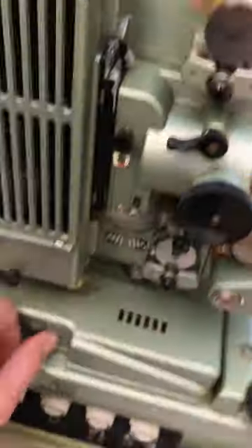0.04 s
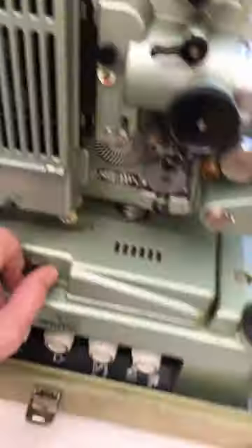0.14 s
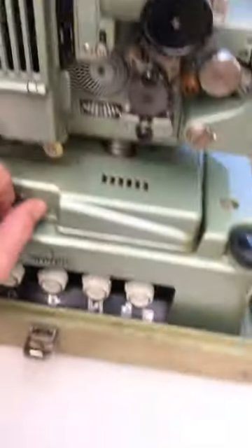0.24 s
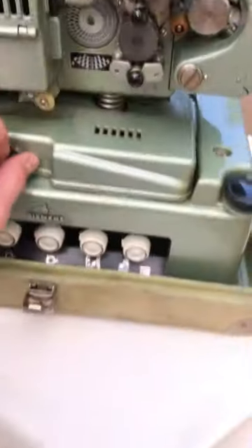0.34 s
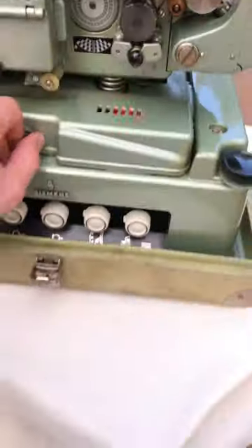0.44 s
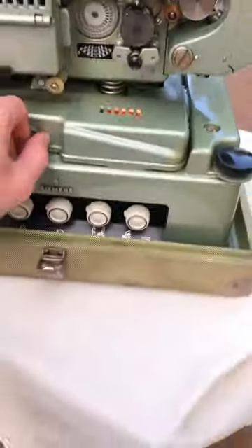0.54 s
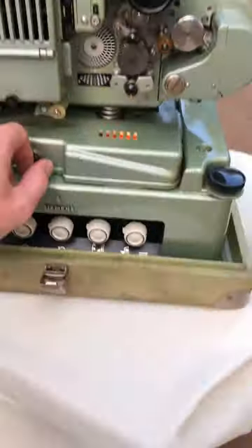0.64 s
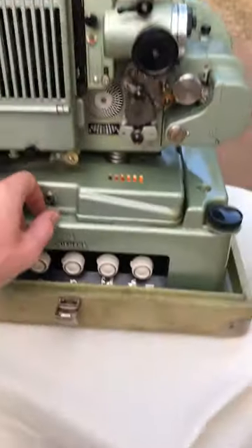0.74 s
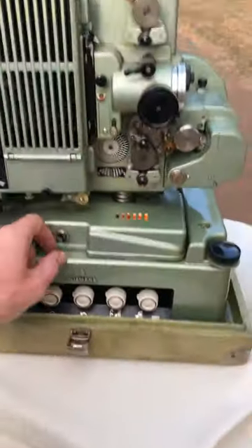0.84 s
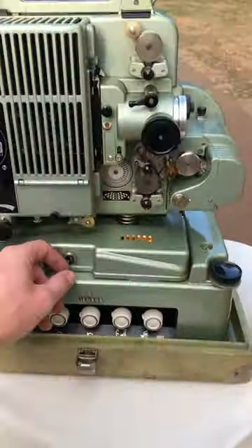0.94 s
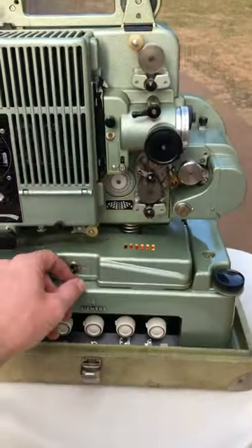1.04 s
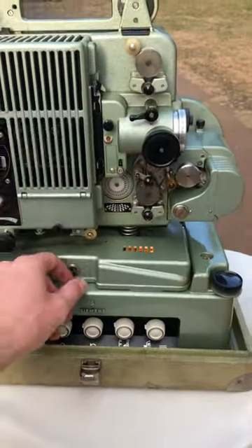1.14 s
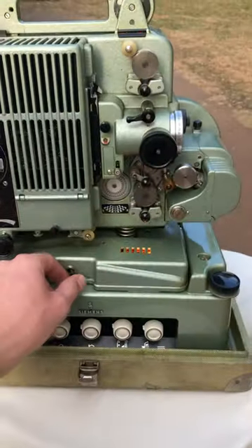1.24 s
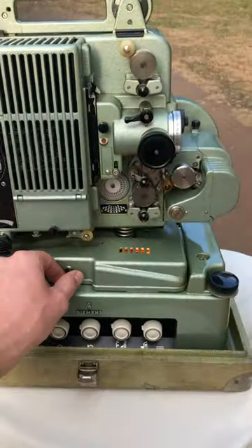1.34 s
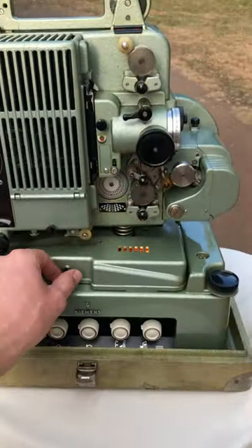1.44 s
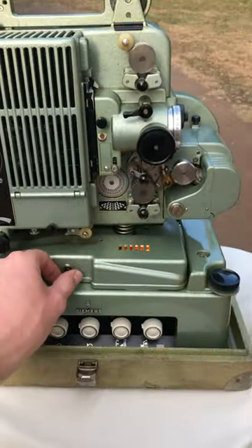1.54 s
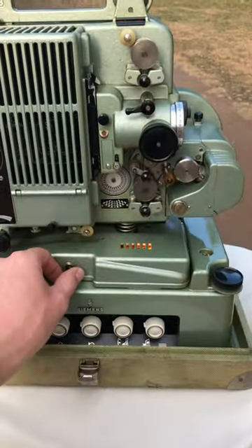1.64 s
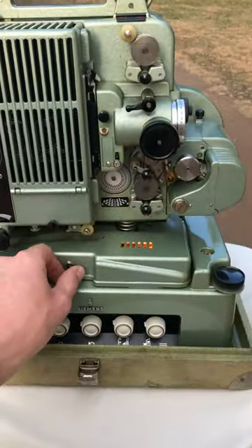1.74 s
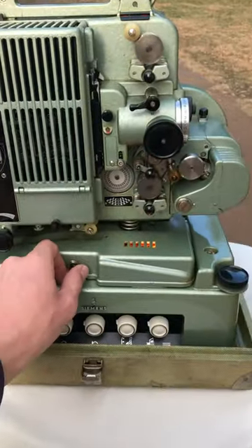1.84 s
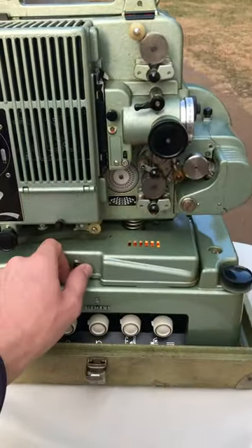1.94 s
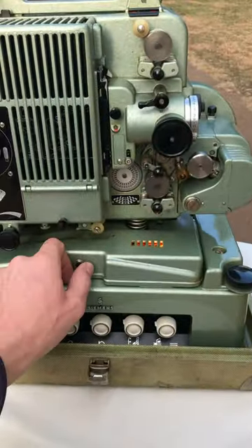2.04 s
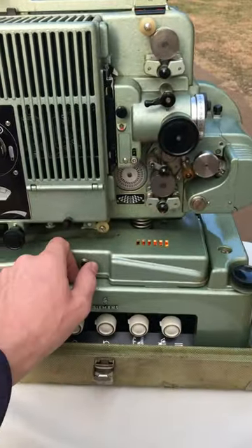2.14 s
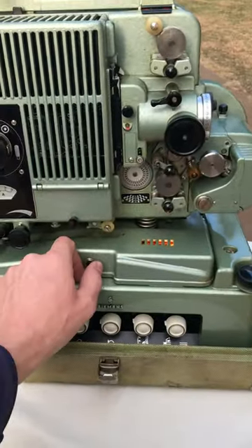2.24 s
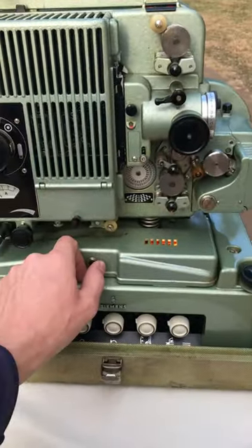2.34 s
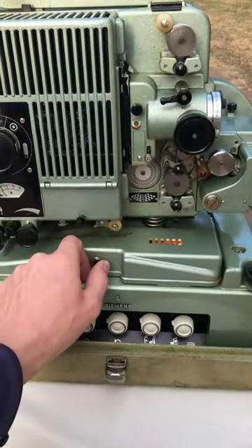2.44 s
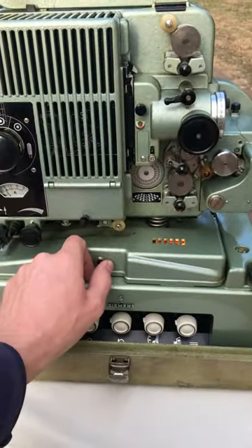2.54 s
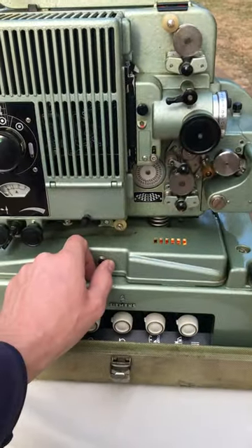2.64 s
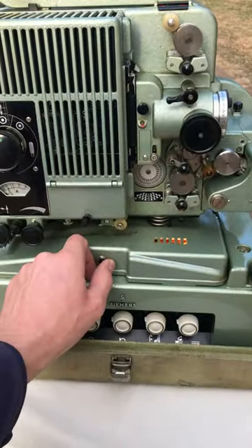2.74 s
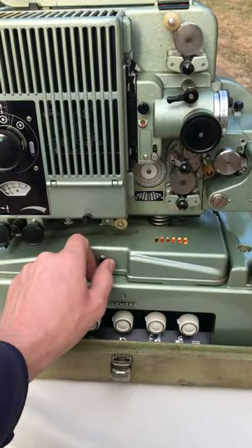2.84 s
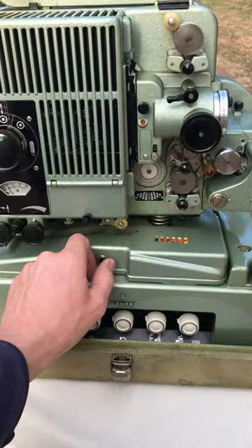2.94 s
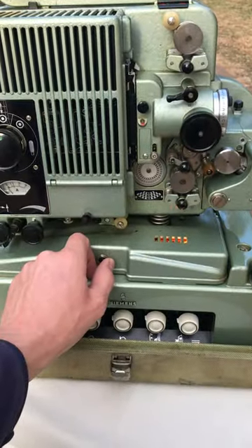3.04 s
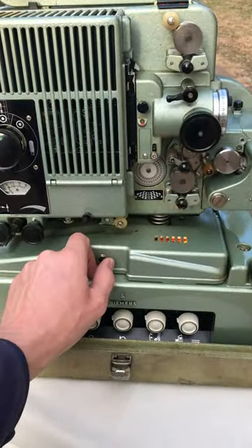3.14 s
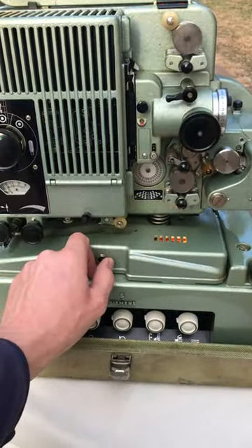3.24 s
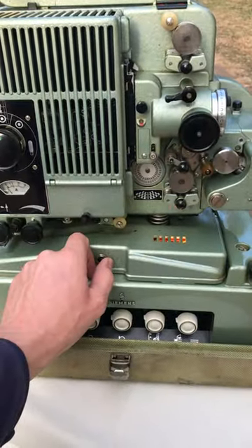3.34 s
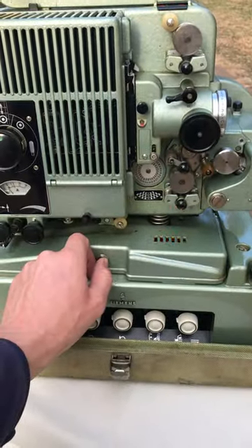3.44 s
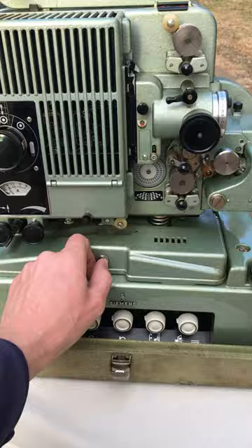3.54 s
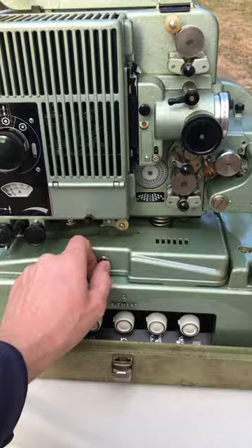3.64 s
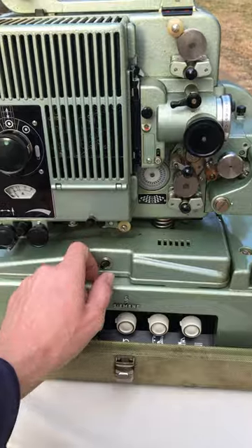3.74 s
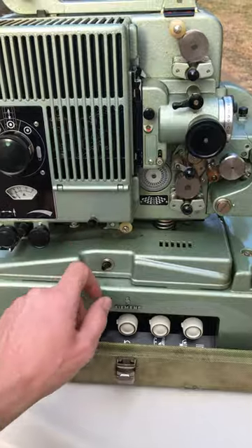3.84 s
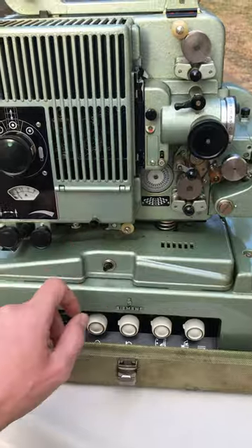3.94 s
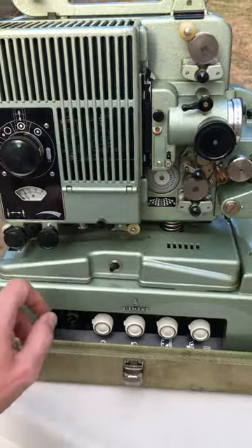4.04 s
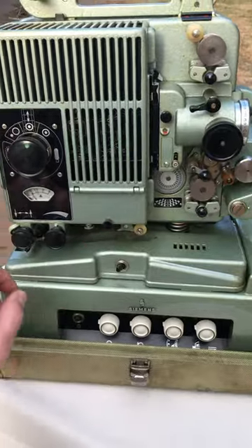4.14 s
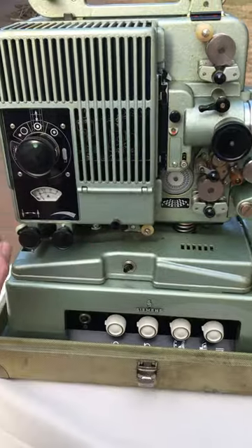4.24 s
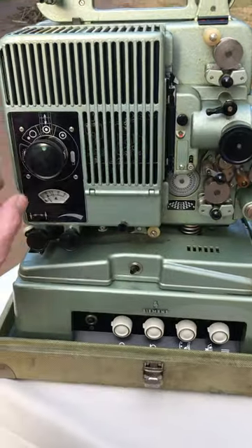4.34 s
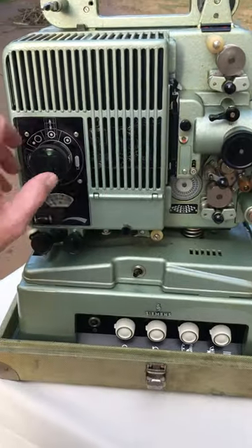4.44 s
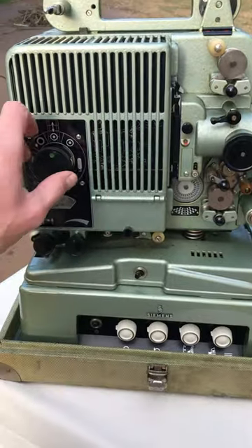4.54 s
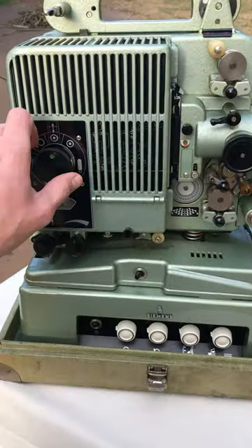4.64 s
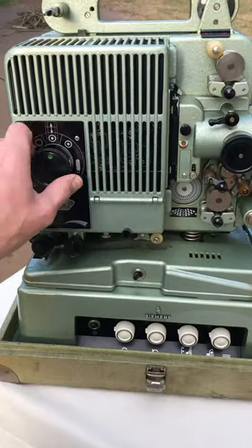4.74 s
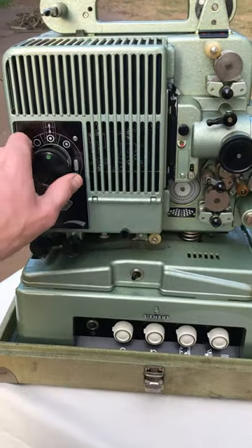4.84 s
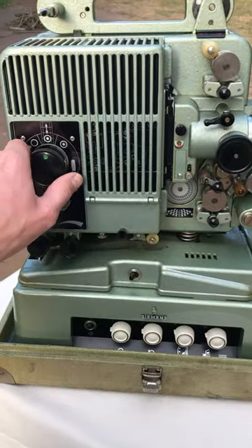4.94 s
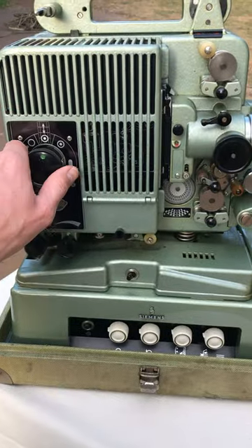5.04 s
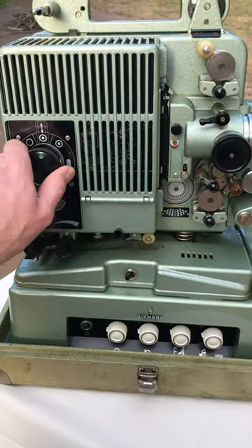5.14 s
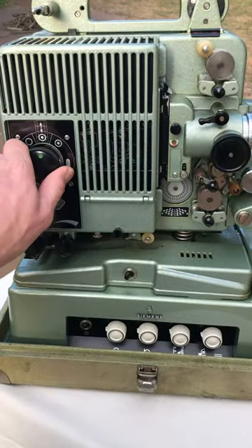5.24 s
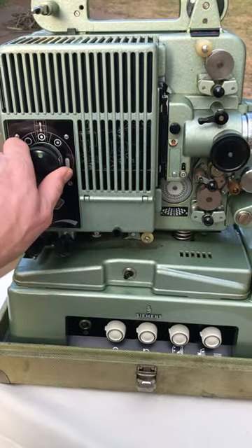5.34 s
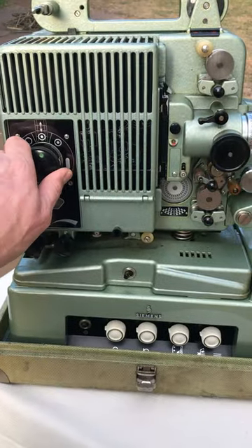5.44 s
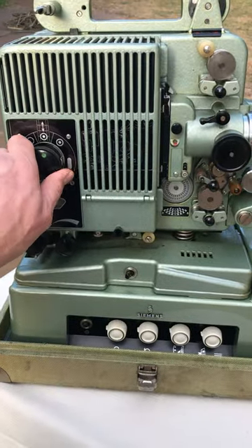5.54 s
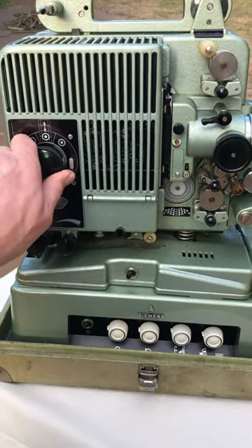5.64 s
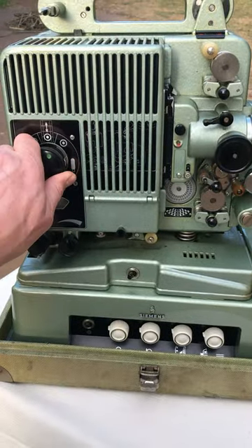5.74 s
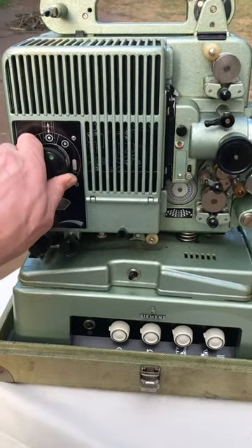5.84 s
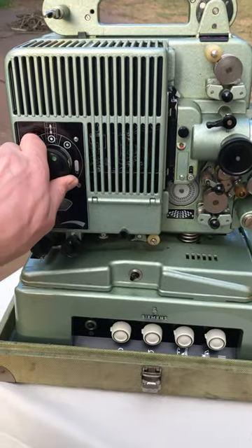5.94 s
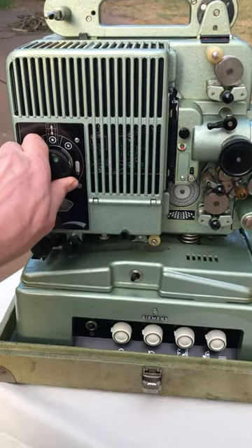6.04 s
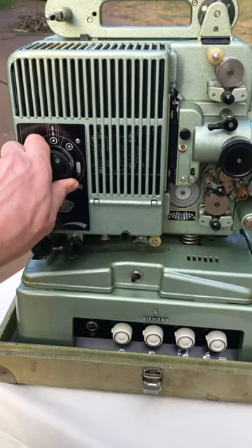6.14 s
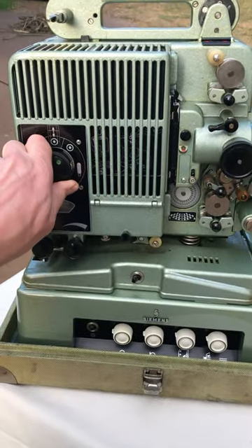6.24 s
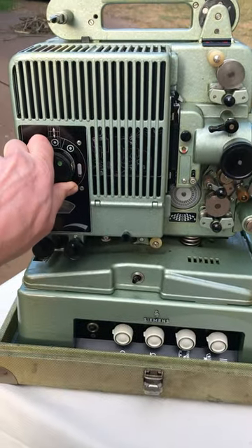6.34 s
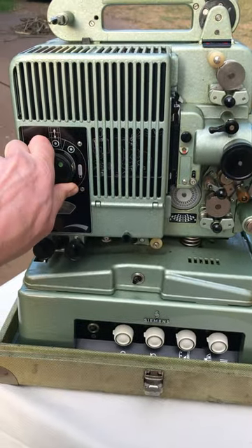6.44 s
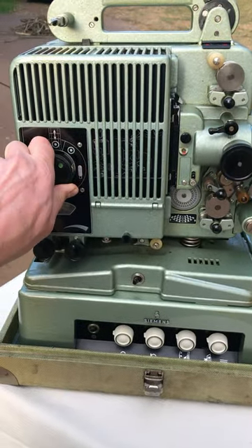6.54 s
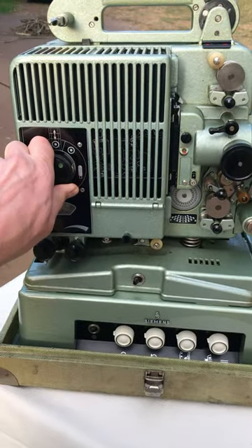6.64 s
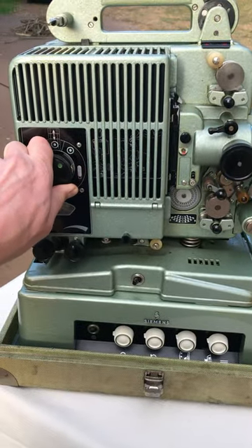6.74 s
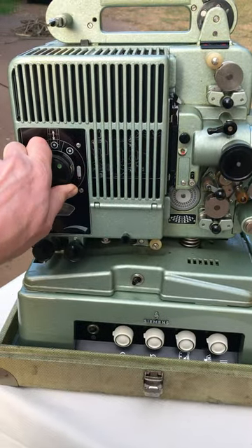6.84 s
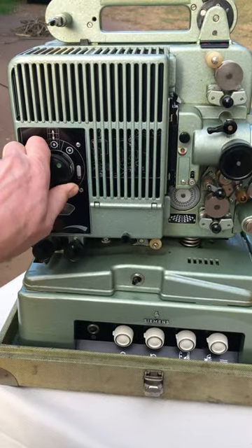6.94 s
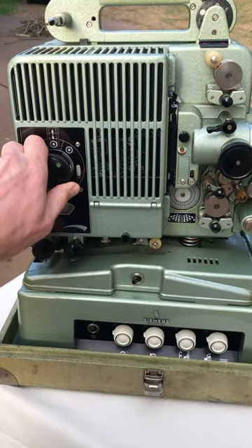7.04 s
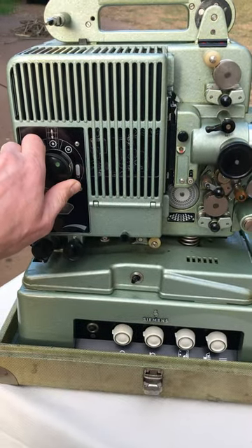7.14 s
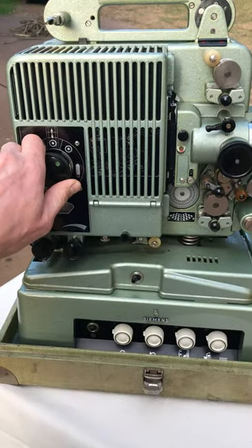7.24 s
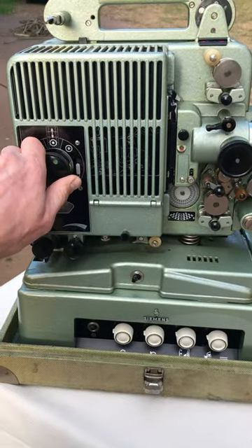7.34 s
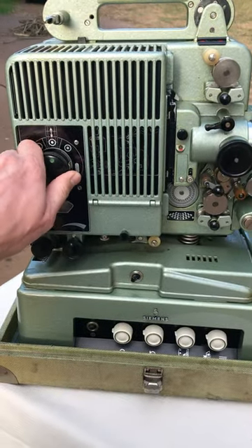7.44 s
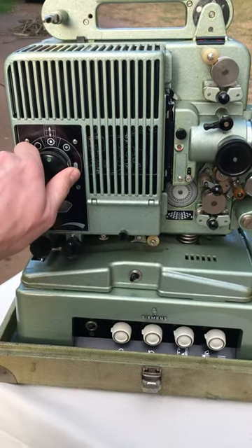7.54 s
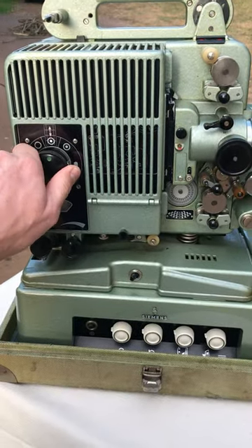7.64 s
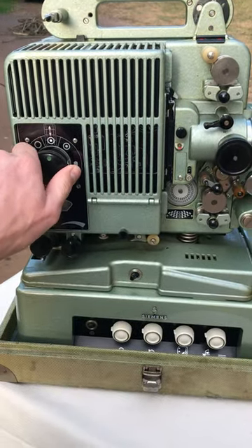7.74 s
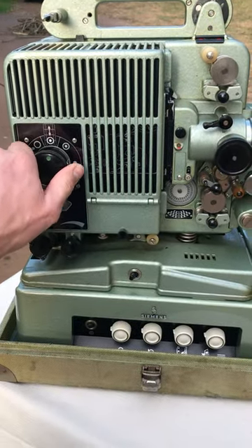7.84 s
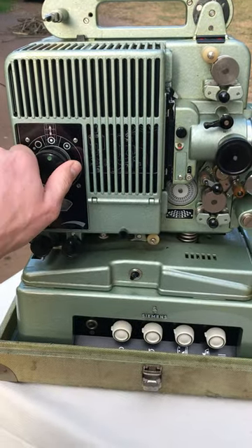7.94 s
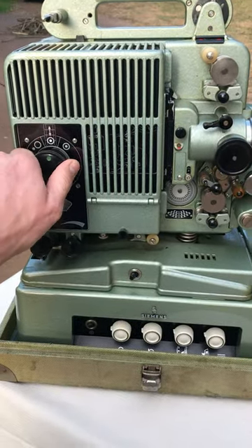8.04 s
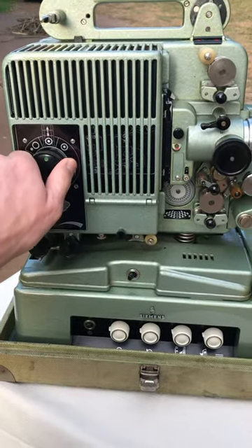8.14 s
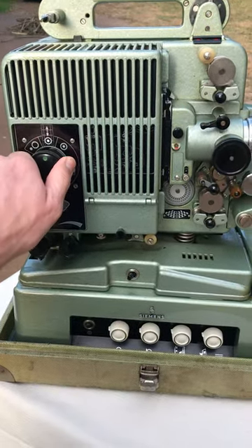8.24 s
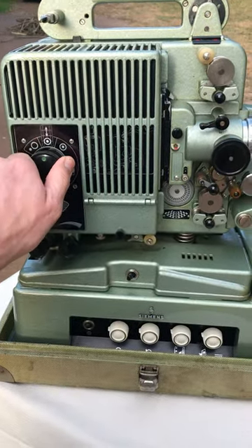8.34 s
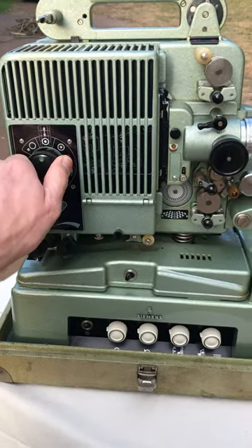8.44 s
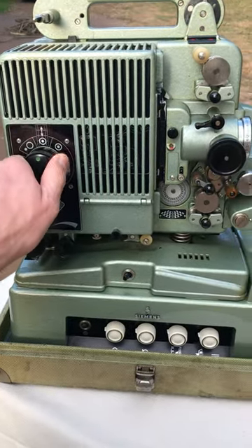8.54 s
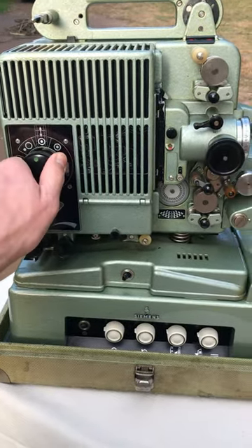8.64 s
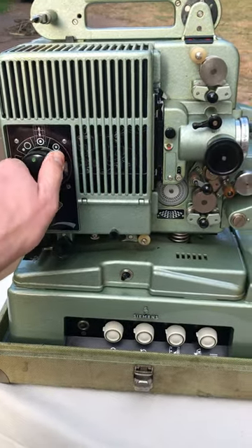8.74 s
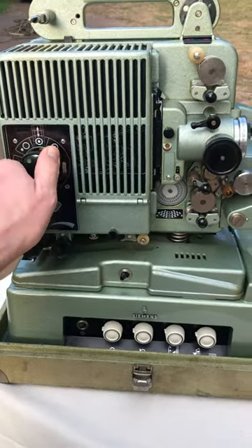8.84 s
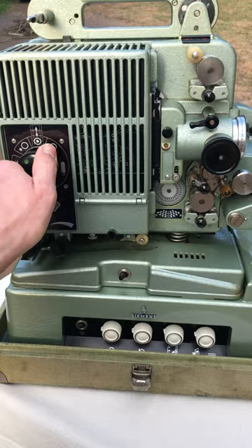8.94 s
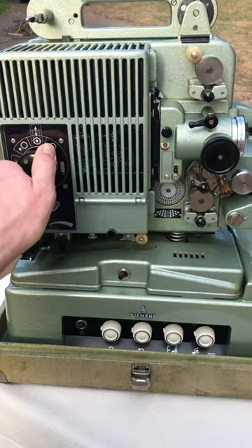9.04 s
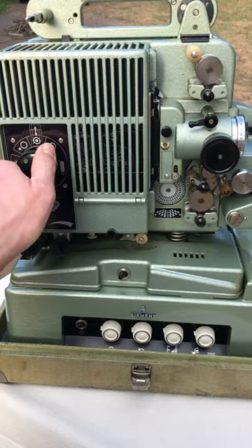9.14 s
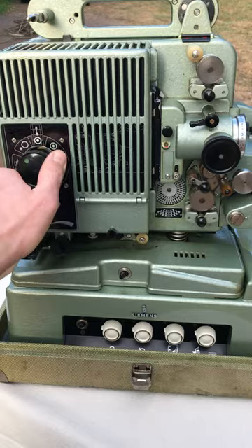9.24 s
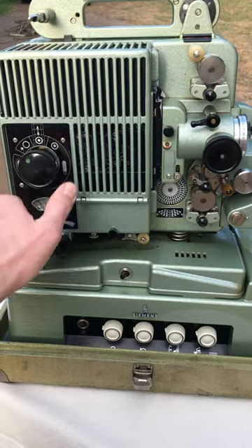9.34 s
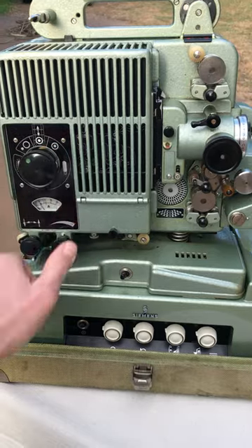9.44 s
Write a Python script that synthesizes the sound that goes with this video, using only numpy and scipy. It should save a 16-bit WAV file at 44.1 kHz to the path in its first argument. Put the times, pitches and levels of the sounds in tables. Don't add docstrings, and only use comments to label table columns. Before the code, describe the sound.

Close to an old film projector running without film outdoors, a fast metallic claw clatter rings over blowing fan air, motor hum and gear whine. A sharp toggle snap comes almost at once, another a few seconds later. Near the end a heavy knob clicks, the rhythm slows and fades, and a small tap follows. Faint breeze rumbles on the hand-held phone.

```python
import sys
import numpy as np
from scipy import signal
from scipy.fft import rfft, irfft, next_fast_len
from scipy.io import wavfile
from scipy.ndimage import uniform_filter1d

SR = 44100
rng = np.random.default_rng(int(sys.argv[2]) if len(sys.argv) > 2 else 0)


def invert_db(x):
    u = np.asarray(x, float) / 20
    return 10 ** u


def inscribe(sig):
    pcm = np.round(np.clip(np.atleast_2d(sig).T, -1, 1) * 32767)
    wavfile.write(sys.argv[1], SR, pcm.astype(np.int16))


N = 418931
TIME = np.arange(N) / SR
POWER_OFF_S = 8.882


def curves(table):
    s, *columns = np.transpose(table)
    return [np.interp(TIME, s, column) for column in columns]


def noise():
    return rng.standard_normal(N)


def colour(x, points, bumps=(), lo_hz=0, hi_hz=SR):
    size = next_fast_len(N)
    hz = np.arange(size // 2 + 1) * SR / size + 1
    point_hz, point_db = np.transpose(points)
    db = np.interp(np.log(hz), np.log(point_hz), point_db)
    for centre_hz, width_hz, lift_db in bumps:
        db += lift_db / (1 + (2 * (hz - centre_hz) / width_hz) ** 2)
    edges = (1 + (lo_hz / hz) ** 12) * (1 + (hz / hi_hz) ** 12)
    y = irfft(rfft(x, size) * invert_db(db) / np.sqrt(edges), size)[:N]
    return y / np.std(y[N // 2:3 * N // 4])


def ring(x, modes):
    out = np.zeros(N)
    for hz, t60_s, db in modes:
        pole = np.exp(2j * np.pi * hz / SR - np.log(1000) / (t60_s * SR))
        out += invert_db(db) * signal.lfilter([1], [1, -pole], x).imag
    return out


def walk(rate_hz):
    k = int(SR / rate_hz)
    steps = np.repeat(rng.standard_normal(N // k + 1), k)[:N]
    wander = uniform_filter1d(uniform_filter1d(steps, k), k)
    return wander / np.std(wander)


def push(x, hz, rise_s, late_s):
    t = np.arange(int(rise_s * SR)) / SR
    shape = np.sin(np.pi * t / rise_s) ** 2 * np.sin(2 * np.pi * hz * t)
    wait = np.zeros(int(late_s * SR))
    return np.convolve(x, np.r_[wait, shape / np.sum(np.abs(shape))])[:N]


def fade(x, decay_s):
    return signal.lfilter([1], [1, -np.exp(-1 / (decay_s * SR))], x)


# start_s, nearness_db, lens_side (0-1), vent_side (0-1)
PHONE = [(0, 4, 0.9, 0.8), (.15, .5, 0.9, 1), (.3, 2, .8, 0.4), (.5, -1.5, 0.53, 0.2), (.85, 0.2, 0.25, 0),
         (1.1, -0.9, 0.1, 0), (1.6, -0.5, 0.18, 0), (2.3, 0.5, 0, 0.53), (4.4, 0, 0.06, 0.35),
         (5, 0, 0.04, 1), (9.5, 0.5, 0.02, 0.7)]


def phone_place():
    return curves(PHONE)


def beam(part):
    _, lens, vent = phone_place()
    away_db, lens_db, vent_db = part
    return away_db + lens_db * lens + vent_db * vent


# start_s, speed_turns_per_s
SHAFT = [(0, 31.468), (.5, 31.305), (1, 31.466), (2, 31.61), (3, 31.779), (4, 32.078), (5, 32.119),
         (6, 32.229), (7, 32.498), (8, 32.568), (8.88, 32.676), (9.05, 25.5), (9.24, 16), (9.5, 11.1)]


def shaft_speed():
    return curves(SHAFT)[0]


# running_db, db_per_db_of_nearness, lens_side_db,
# speed_power (no unit), coasting_db_per_s
RANGES = [(-34, 0.46, 1.5, 0.26, -30.5), (-36.5, 1.04, -1, 1.27, -27), (-41.5, 0.6, 4, 1.6, -25)]


def heard():
    near_db, lens, _ = phone_place()
    running_turns_s = 32.676
    slowing_db = 20 * np.log10(np.minimum(shaft_speed() / running_turns_s, 1)) * (TIME > POWER_OFF_S)
    coasting_s = np.maximum(TIME - POWER_OFF_S, 0)
    return [db + near * near_db + side * lens + power * slowing_db + fall * coasting_s
            for db, near, side, power, fall in RANGES]


# pitch_hz, level_db (per Hz)
GARDEN = [(18, -45), (30, -6), (345, -3.5), (437, -18), (866, -23), (1010, -29.5), (1320, -3), (1630, -9),
          (3220, -7), (16000, -40)]


def garden():
    return invert_db(-57 + 0.86 * walk(4.4)) * colour(noise(), GARDEN)


# start_s (middle of the puff), level_db, length_s
GUSTS = [(0, -61, .2), (.79, -69, .15), (1.8, -66, .2), (2.46, -65, .15), (3.2, -59, 0.22), (3.8, -61, .3),
         (4.3, -67, 0.28), (4.95, -59, 0.22), (6.24, -67, .5), (7.75, -64, 0.33), (8.6, -56, .5),
         (9.07, -54, .15), (9.3, -62, .2)]


def breeze():
    rumble = colour(noise(), [(20, -25), (33, -14), (46, 4), (62, -9), (90, -6), (200, -37)])
    level = invert_db(-66.5)
    for s, db, length_s in GUSTS:
        level = level + invert_db(db - 3.0) * np.exp(-((TIME - s) / length_s) ** 2)
    return level * rumble


# start_s, level_db, pitch_hz, t60_s
BUMPS = [
    (9.02, -56, 70, .08),
    (9.425, -40, 75, .1),
    (9.472, -43, 370, .04),
    (9.4718, -27.5, 1580, .012),
    (9.4718, -28, 2600, .008),
]


def bumps():
    out = np.zeros(N)
    for s, db, hz, t60_s in BUMPS:
        blow = np.zeros(N)
        blow[int(s * SR)] = 1
        out += ring(blow, [(hz, t60_s, db)])
    return out


# start_s, level_db
HUM = [(0.0, -42.5), (0.71, -46), (0.92, -52), (1.27, -47), (1.48, -52), (1.82, -45), (2.04, -57),
       (3.8, -56), (9.5, -62)]


def mains_hum():
    hum = np.sin(2 * np.pi * (60 * TIME + 0.2 * walk(8.8)))
    return np.sqrt(2) * invert_db(curves(HUM)[0] - 2.5 + .9 * walk(4.4)) * hum


def panel_tone():
    buzz_hz, off_s = 623, .45
    level = invert_db(-44.5 + 11 * TIME) * (TIME < off_s)
    return np.sqrt(2) * level * np.sin(2 * np.pi * buzz_hz * TIME)


MOTOR_ORDERS = [1, 2, 6]
CAM_ORDERS = [5, 6, 13, 15, 18, 21, 31, 34, 37, 39, 41]
LINES_DB = [-66, -58.5, -48.5, -66, -59, -61.5, -61, -52, -48.5, -51.5, -55.5, -43, -45.5, -51.5]
# away_db, lens_side_db (added), vent_side_db (added)
MESH_BEAM = (1.5, -27, -.3)


def motor_and_gears(turns, low_db):
    motor_ratio = 17 / 12
    orders = [k * motor_ratio for k in MOTOR_ORDERS] + list(CAM_ORDERS)
    mesh_db = beam(MESH_BEAM)
    out = np.zeros(N)
    for order, db in zip(orders, LINES_DB):
        level = invert_db(db + mesh_db * (order > 30) + 1.2 * walk(5))
        out += level * np.sin(2 * np.pi * (order * turns + rng.random()))
    unloaded_db = -6.5 * np.clip((TIME - POWER_OFF_S) / 0.076, 0, 1)
    return np.sqrt(2) * out * invert_db(low_db - np.median(low_db) + unloaded_db)


# pitch_hz, level_db (per Hz)
WASH = [(59, -27), (100, -13), (220, -9.5), (273, -4), (392, -6.5), (670, -3.5), (1240, -1), (1640, -13.5),
        (3180, -12), (4780, -23), (5430, -16), (10800, -33.5), (13300, -33), (15500, -44), (16500, -62)]
# pitch_hz, width_hz, lift_db
DUCTS = [(666, 48, 1.5), (896, 177, 7), (1265, 70, 2), (2167, 50, 6.5), (3140, 520, -2.5), (4170, 120, 5),
         (5330, 250, -3), (6700, 150, 1.5), (9750, 610, 11), (13200, 900, -3), (15300, 500, 3)]
# away_db, lens_side_db (added), vent_side_db (added)
DRONE_BEAM = (-63.5, 32, -.3)


def wash(low_db, mid_db, top_db):
    deep = colour(noise(), WASH, hi_hz=445) * invert_db(low_db - 15 + 0.69 * walk(6.3))
    low = colour(noise(), WASH, DUCTS, 480, 1700) * invert_db(low_db + .6 * walk(9))
    mid = colour(noise(), WASH, DUCTS, 1553, 4940) * invert_db(mid_db + 0.51 * walk(40))
    top = colour(noise(), WASH, DUCTS, 5000) * invert_db(top_db - 7.5 + 1.0 * walk(150))
    drone = colour(noise(), [(600, -45), (820, 1), (900, 1), (980, 4), (1300, -33)])
    return deep + low + mid + top + invert_db(beam(DRONE_BEAM)) * drone


CONTACTS = {"crack": (9700, 6500, 0.0021), "fizz": (18400, 2100, 0.0014), "clack": (6100, 1400, 0.0018),
            "rattle": (5700, 7100, 0.0036), "knock": (3240, 910, .003), "thud": (1600, 1200, .002),
            "scuff": (1700, 2000, 0.013), "tap": (4300, 3000, .0008), "tock": (1900, 1700, 0.00089)}


def snap(contact):
    hz, width_hz, decay_s = CONTACTS[contact]
    t = np.arange(1200) / SR
    edges = np.clip([hz - width_hz / 2, hz + width_hz / 2], 200, .45 * SR)
    band = signal.butter(2, edges, "bandpass", fs=SR, output="sos")
    burst = signal.sosfilt(band, rng.standard_normal(1200))
    return burst / np.std(burst) * np.exp(-t / decay_s) * np.minimum(t / 0.00013, 1)


# start_s, contact (name), snap_db, ring_db
TOGGLE = [(.089, "scuff", -28, -40), (.4494, "clack", -14.5, -40), (.4496, "crack", -10.5, -7.5),
          (.4497, "fizz", -9, -40), (.4505, "thud", -8, -40), (.4515, "rattle", -33, -33),
          (.455, "thud", -22, -16), (3.4365, "crack", -7.5, -41), (3.4367, "fizz", -14, -32),
          (3.4385, "knock", -12, -13), (3.4393, "crack", -15, -5.5), (3.4413, "rattle", -20, -14),
          (9.114, "scuff", -35.5, -40), (9.4694, "tap", -30, -59), (9.4718, "tock", -27, -45),
          (9.472, "rattle", -48, -60)]
# start_s, contact (name), snap_db, ring_db
DETENT = [
    (8.8773, "fizz", -9, -40),
    (8.8812, "crack", -15.5, -6.5),
    (8.8823, "rattle", -18.5, -12),
    (8.8845, "fizz", -14, -18),
    (8.8925, "rattle", -30, -20),
]
# pitch_hz, t60_s, level_db
LID = [(1470, 0.0094, 10), (1840, 0.015, 1), (2285, 0.031, 1.5), (3160, 0.033, -6.5), (4030, 0.018, -4.5),
       (6280, 0.023, -6)]
# pitch_hz, t60_s, level_db
KNOB = [(2680, .03, -13), (3530, 0.024, -7), (3920, 0.019, -1), (5800, .015, 2), (8640, .02, -10)]


def switches():
    out, lid, knob = np.zeros((3, N))
    for rows, body, lift_db in ((TOGGLE, lid, -10), (DETENT, knob, -4)):
        for s, contact, snap_db, ring_db in rows:
            i = int(s * SR)
            out[i:i + 1200] += invert_db(snap_db) * snap(contact)[:N - i]
            body[i] = invert_db(ring_db + lift_db)
    out += ring(lid, LID) + ring(push(knob, 3900, 0.00054, 0), KNOB)
    return signal.sosfilt(signal.butter(4, 1150, "highpass", fs=SR, output="sos"), out)


def blows(turns, place, scatter_db=1.1):
    chance = rng.standard_normal((300, 2))
    at = np.arange(300) + place + .001 * chance[:, 0]
    inside = at < turns[-1] - .05
    where = np.interp(at[inside], turns, np.arange(N))
    out = np.zeros(N)
    out[where.astype(int)] = invert_db(scatter_db * chance[inside, 1])
    return out


PLACES = [.808, .15, .182, .495, .598, .872, .112]
# casing_db, plate_db, spring_db, tick_db, tick_dulls_above_hz
KNOCKS = [(-0.5, -3.5, 4, 0.5, 18000), (-5, -13.5, -5, -6, 14000), (-13, -12, -2, 1.5, 13000),
          (-14.5, -57, -2.5, -5, 13000), (-7, -37, -4, -12.5, 11000), (-9.5, -10.5, -4.5, -5, 9500),
          (-21, -40, -15, -14, 17000)]
COASTING_DB = [-14, -8, -8, 8, 0, -14, -8]
# pitch_hz, t60_s, level_db
CASING = [(1162, 0.067, -11), (1287.3, 0.047, -3), (1069, 0.067, -18.5), (940, 0.014, -10),
          (1355, 0.08, -15.5), (690, 0.039, -8.5)]
PLATE = [(3280, 0.0094, -1.5), (3730, 0.0025, -2.5), (2140, 0.011, -37)]
SPRING = [(5356, 0.016, -5), (6090, 0.0037, -17), (7300, 0.0075, -17)]
GATE = [(6370, .012, -6), (5900, 0.0057, -1)]
LATCH = [(8540, 0.014, 0)]
# pitch_hz, level_db (per Hz)
TICK = [(2650, -11), (4500, -3.5), (5240, -5.5), (6800, 2), (7750, -4), (9840, -5), (10700, -12),
        (11700, -5.5), (15200, -6.5), (16100, -15), (16500, -42)]
# away_db, lens_side_db (added), vent_side_db (added)
PLATE_BEAM = (-1.1, 4.4, 3)
SECOND_BEAM = (-17.5, .2, 20)
GATE_BEAM = (-60.5, 39.5, -.3)
MAIN_TICK_BEAM = (-2, 2.5, 3.5)
MAIN_CASING_BEAM = (0.69, 2.6, .1)


def claw(turns, low_db, mid_db, top_db):
    casing, plate, spring, tick, latch, spray = np.zeros((6, N))
    t, grit = np.arange(256) / SR, noise()
    lens = phone_place()[1]
    plate_db, second_db = beam(PLATE_BEAM), beam(SECOND_BEAM)
    latch_db = -28 - 88 * (lens - 0.57) ** 2 - 20 * (TIME > POWER_OFF_S)
    slack = np.clip((TIME - POWER_OFF_S) / .25, 0, 1)
    slack_plate_db = -9 * slack ** 2
    for k, (place, row) in enumerate(zip(PLACES, KNOCKS)):
        hit_casing_db, hit_plate_db, hit_spring_db, tick_db, dull_hz = row
        hit = blows(turns, place)
        casing += invert_db(hit_casing_db + beam(MAIN_CASING_BEAM) * (k == 0)) * hit
        plate += invert_db(hit_plate_db + plate_db + second_db * (k == 1) + slack_plate_db) * hit
        spring += invert_db(hit_spring_db) * hit
        bright = invert_db(tick_db + COASTING_DB[k] * slack + beam(MAIN_TICK_BEAM) * (k == 0)) * hit
        tick += bright
        crack_shape = rng.standard_normal(len(t)) * np.exp(-t / 0.00086)
        crack = signal.oaconvolve(bright, crack_shape)[:N]
        rattle = (.4 * fade(bright, 0.00056) + 0.38 * fade(bright, 0.006)) * grit
        dull = signal.butter(2, min(dull_hz, .45 * SR), fs=SR, output="sos")
        spray += signal.sosfilt(dull, 0.96 * crack + rattle)
        latch += hit * (k == 2)
    out = invert_db(low_db + 13.0) * ring(push(casing, 1143, 0.0026, 0.001298), CASING)
    out += invert_db(mid_db + 21) * ring(push(plate, 3330, 0.00093, .0001), PLATE)
    out += invert_db(top_db + 16.5) * ring(push(spring, 6320, 0.00097, 0), SPRING)
    out += invert_db(beam(GATE_BEAM)) * ring(tick, GATE) + invert_db(latch_db) * ring(latch, LATCH)
    out += invert_db(top_db) * colour(spray, TICK)
    return invert_db(-0.42 - 2.5 * lens - 0.5 * (TIME > POWER_OFF_S)) * out


def scene():
    turns = np.cumsum(shaft_speed()) / SR
    low_db, mid_db, top_db = heard()
    surroundings = garden() + breeze() + bumps()
    hums = mains_hum() + panel_tone() + motor_and_gears(turns, low_db)
    rush = wash(low_db, mid_db, top_db)
    knocks = claw(turns, low_db, mid_db, top_db)
    return (surroundings + hums + rush + switches() + knocks)[None]


def top_cut(x):
    return signal.sosfilt(signal.butter(12, 17150, fs=SR, output="sos"), x)


def record(dry):
    ceiling = .7
    x = signal.sosfilt(signal.butter(4, 40, "highpass", fs=SR, output="sos"), dry)
    x = ceiling * np.tanh(x / ceiling)
    mix = signal.sosfilt(signal.ellip(8, .2, 30, 15800, fs=SR, output="sos"), x)
    return top_cut(mix)


dry = scene()
out = record(dry)
inscribe(out)
```